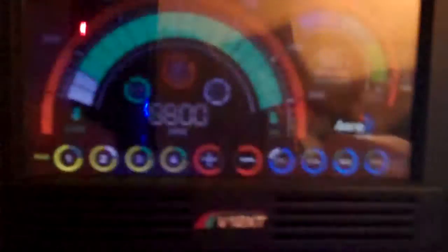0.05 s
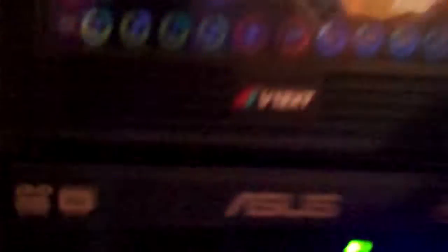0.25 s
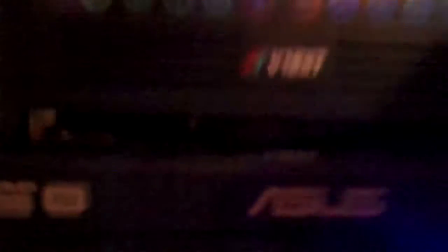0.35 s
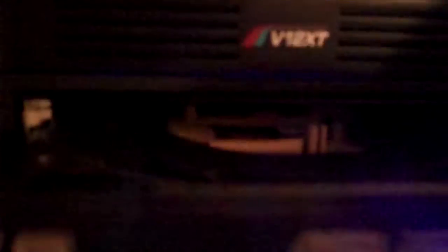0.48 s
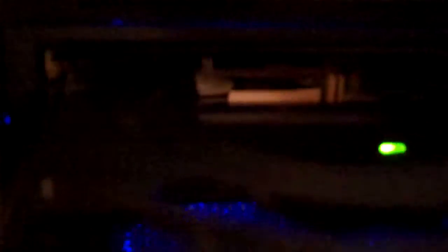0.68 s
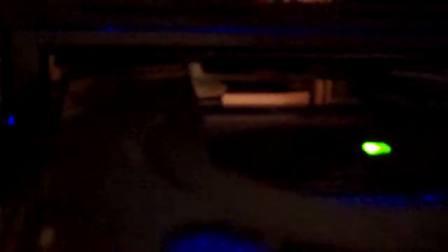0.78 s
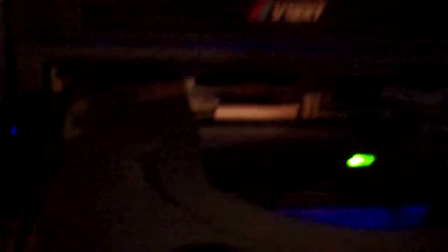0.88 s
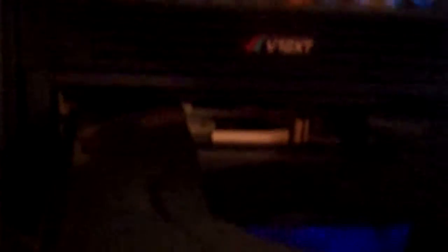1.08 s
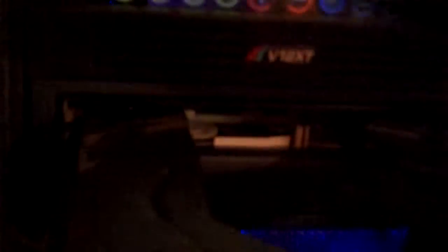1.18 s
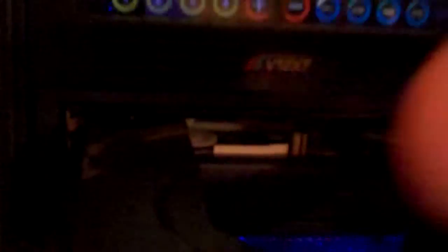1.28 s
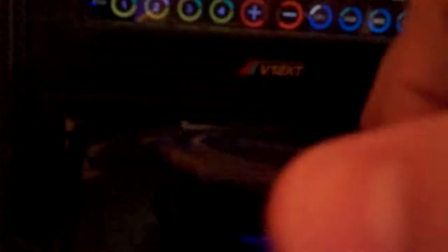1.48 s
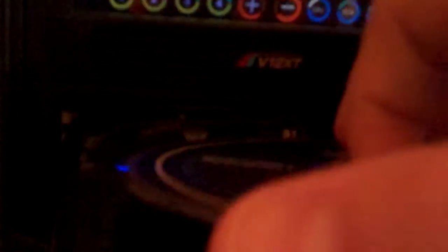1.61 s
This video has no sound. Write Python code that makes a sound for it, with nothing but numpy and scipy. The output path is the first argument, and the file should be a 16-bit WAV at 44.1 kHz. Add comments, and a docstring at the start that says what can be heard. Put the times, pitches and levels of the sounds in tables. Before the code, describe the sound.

A compact disc is placed on an open plastic computer drive tray, heard close in a small room. At 0.15-0.35 s it bumps, scrapes and chatters brightly, loudest near 0.29. A faint gritty slide with tiny squeaks follows until a crisp paired click at 0.86 and brief rattle. Near 1.44 s comes a light double tap, then faint rustle. A quiet fan whirs throughout.

```python
"""A compact disc is laid on the open plastic tray of a computer drive, close by in a small room.
It bumps the tray, scrapes, chatters and clicks over the rim, slides on with brief squeaks and seats in
its recess with a close pair of clicks and a grainy rattle; later the tray gets a light double tap and
a faint rustle. The computer's fan runs throughout. Impacts excite decaying modes and noise bursts;
friction is filtered random slips; squeaks and rattle are unsteady tones; the fan is noise and tones."""
import sys
import numpy as np
from scipy import signal
from scipy.fft import rfft, irfft
from scipy.io import wavfile
from scipy.ndimage import uniform_filter1d

SR = 44100
rng = np.random.default_rng(int(sys.argv[2]) if len(sys.argv) > 2 else 0)


def generate_wav(signal):
    """Clip the signal to [-1, 1] and save it as 16-bit WAV at the path in sys.argv[1]."""
    frames = np.transpose(np.atleast_2d(signal))
    scaled = np.clip(frames, -1, 1) * 32767
    pcm = np.round(scaled).astype(np.int16)
    wavfile.write(sys.argv[1], SR, pcm)


N = 72765
T = np.arange(N) / SR  # time in seconds

# Soft bumps of the tray. Each row: start in seconds, level in dB.
BUMPS = [(0.1956, -34.5), (0.2, -37.5), (0.217, -40), (0.2318, -32.5), (0.279, -40.5), (0.31, -40.5),
         (1.452, -51), (1.484, -56)]
# Hollow ring of the tray. Each row: frequency in Hz, relative level in dB.
TRAY_MODES = [(170, -9.5), (328, 4.5), (378, 7), (425, 4), (612, -1), (750, 1.5)]
# Colour of a bump. Each row: frequency in Hz, relative level in dB per Hz.
THUD_COLOUR = [(200, -18.5), (370, 2), (800, -6.5), (3000, -39.5)]
# The disc's edge knocking on the tray. Each row: start in seconds, level in dB.
CHATTER = [(0.1442, -52), (0.2013, -29.5), (0.2019, -33), (0.2104, -32.5), (0.2699, -32.5), (0.284, -22),
           (0.2873, -24.5), (0.2899, -17), (0.2922, -36), (0.3, -22), (0.308, -22.5), (0.3126, -23),
           (0.3217, -26), (0.3327, -29.5)]
# Ring of the disc. Each row: frequency in Hz, relative level in dB.
DISC_MODES = [(571, -8.5), (861, -9.5), (1180, 0.5), (1338, -8), (1495, -13), (2386, -2), (3000, 7),
              (3130, 7), (3244, 2), (3296, -9), (3504, 7.5), (3646, -8), (3852, 4), (4130, -21)]
# Colour of the edge, knocking or biting. Each row: frequency in Hz, relative level in dB per Hz.
EDGE_COLOUR = [(150, -47), (250, -19), (543, -18), (1010, -17), (1300, -11), (2270, -13), (3070, -1.5),
               (5180, -9.5), (7630, -13.5), (14000, -31)]
# Sharp clicks of the disc: one on the rim during the scrape, then a close pair as it seats.
# Each row: start in seconds, level in dB, treble tilt in dB per octave.
CLICKS = [(0.2436, -28.5, 4.5), (0.8557, -29.5, 3), (0.857, -33, -2.5)]
# Short ring of the clicks. Each row: frequency in Hz, relative level in dB.
CLICK_MODES = [(520, -3), (690, -4), (1285, 6), (3050, 0), (3480, 1), (4050, -6), (5200, -5), (7450, -1)]
# Light taps on the tray. Each row: start in seconds, level in dB, treble tilt in dB per octave.
TAPS = [(1.4363, -39, -2), (1.4455, -37, -1.5), (1.4472, -35, 1), (1.459, -46.5, -4.5)]
# Ring of the tapped rim. Each row: frequency in Hz, relative level in dB.
TAP_MODES = [(560, -10), (850, -6), (1450, 0.5), (2300, -5), (3000, 0.5), (3880, 7), (5050, -9),
             (6520, 8.5)]
# Contact noise of clicks and taps. Each row: frequency in Hz, relative level in dB per Hz.
SNAP_COLOUR = [(180, -20.5), (500, -3), (1900, -2), (3900, -2.5), (7500, -7), (11500, -15.5), (14000, -25)]
# Strength of the scrape over the rim. Each row: time in seconds, level in dB.
SCRAPE_FORCE = [(0.193, -41.5), (0.2, -41), (0.217, -34.5), (0.227, -45.5), (0.24, -46.5), (0.256, -34),
                (0.275, -32.5), (0.29, -29.5), (0.312, -30), (0.325, -44), (0.365, -44), (0.44, -61)]
# Colour of the scrape. Each row: frequency in Hz, relative level in dB per Hz.
SCRAPE_COLOUR = [(100, -47), (200, -13.5), (945, -2.5), (1190, -0.5), (1910, 0.5), (2950, -4.5),
                 (4160, -15.5), (11800, -28), (14000, -39)]
# Strength of the slide. Each row: time in seconds, level in dB.
SLIDE_FORCE = [(0.145, -55), (0.19, -51.5), (0.33, -46.5), (0.41, -47.5), (0.49, -49), (0.58, -46),
               (0.69, -50), (0.79, -44.5), (0.82, -49.5), (0.875, -46.5), (0.91, -49), (0.96, -74)]
# Colour of the slide. Each row: frequency in Hz, relative level in dB per Hz.
SLIDE_COLOUR = [(100, -42), (310, -5), (600, 1), (980, -6), (1300, 1), (3300, 0.5), (4050, -8), (4600, -7),
                (14000, -26.5)]
# Resonances of the sliding disc. Each row: frequency in Hz, width in Hz, relative level in dB.
SLIDE_PEAKS = [(816, 45, 2), (1285, 51, 1.5), (1880, 99, -0.5), (2940, 180, 0.5), (3150, 180, 1.5),
               (3430, 180, 1), (4300, 280, -5.5), (6050, 320, -8.5)]
# Squeaks of the sliding disc; the last row is a brief grainy rattle just after it seats.
# Each row: start in seconds, length in seconds, frequency in Hz, level in dB.
SQUEAKS_AND_RATTLE = [(0.24, 0.014, 7270, -38.5), (0.371, 0.039, 4520, -51), (0.739, 0.0063, 3490, -39.5),
                      (0.769, 0.0081, 3600, -40.5), (0.829, 0.015, 3190, -45), (0.864, 0.015, 3980, -46)]
# Strength of the faint rustle of handling. Each row: time in seconds, level in dB.
RUSTLE_FORCE = [(1.46, -67), (1.515, -66.5), (1.57, -60.5), (1.585, -85)]
# Colour of the rustle. Each row: frequency in Hz, relative level in dB per Hz.
RUSTLE_COLOUR = [(250, -24), (350, 2), (600, 9), (4500, 2.5), (8500, -0.5), (10000, -9)]
# Colour of the fan's rushing air. Each row: frequency in Hz, relative level in dB per Hz.
FAN_COLOUR = [(30, 1), (127, -13.5), (264, -6), (401, -4), (476, -6.5), (899, -2.5), (1150, -3),
              (3100, -13), (14000, -33.5)]
# Blade tones of the fan. Each row: frequency in Hz, level in dB.
FAN_LINES = [(268.5, -78.5), (860, -70.5), (931.3, -72.5), (1065, -68.5), (1199, -74)]

# ring times are t60 at 1 kHz, higher modes die sooner; the finger damps the tapped rim
TRAY_RING_S, DISC_RING_S, CLICK_RING_S, TAP_RING_S = 0.061, 0.15, 0.057, 0.036
BUMP_T60_S, EDGE_T60_S, CLICK_T60_S = 0.035, 0.034, 0.024  # contact noise
DISC_RING_DB, CLICK_RING_DB, SLIDE_RING_DB = -9.5, -3.5, -0.5
THUD_DB, SNAP_DB = 1, -1  # contact noise against the ring
GRAINS_PER_S, SCRAPE_SCATTER_DB, SLIDE_SCATTER_DB = 6000, -3, 1.5
BITE_DB = 31.5  # hard pressure makes the edge bite: a bright layer that grows with the force squared
FLUTTER_DB = 2.5  # uneven grip of the slide
FAN_DB = -59  # rushing air
ROOM_T60_S, ROOM_DB, ROOM_DAMP_HZ = 0.26, -10, 4570
LOW_CUT_HZ, TOP_HZ = 190, 14100


def impacts():
    """Impulsive excitation: each blow sets a body ringing and adds a burst of contact noise."""
    out = ring(TRAY_MODES, TRAY_RING_S, BUMPS)
    out += undb(DISC_RING_DB) * ring(DISC_MODES, DISC_RING_S, CHATTER)
    out += clicks(CLICKS, CLICK_MODES, CLICK_RING_S)
    out += clicks(TAPS, TAP_MODES, TAP_RING_S)
    for start, db in BUMPS:
        add(out, start, undb(db + THUD_DB) * crack(THUD_COLOUR, BUMP_T60_S))
    for start, db in CHATTER:
        add(out, start, undb(db) * crack(EDGE_COLOUR, EDGE_T60_S))
    return out


def clicks(rows, modes, t60):
    """Contact stiffness: a snap of noise and a short ring; harder contact favours the high modes."""
    out = np.zeros(N)
    for start, db, tilt in rows:
        tilted = [(hz, level + tilt * np.log2(hz)) for hz, level in modes]
        out += undb(CLICK_RING_DB) * ring(tilted, t60, [(start, db)])
        add(out, start, undb(db + SNAP_DB) * crack(SNAP_COLOUR, CLICK_T60_S, tilt))
    return out


def ring(modes, t60, blows, detune_hz=7):
    """Modal decay: each mode stores the energy of the blows and leaks it away, its pitch unsteady."""
    energy = np.zeros(N)
    for start, db, *_ in blows:
        energy[int(start * SR)] += undb(db) ** 2
    contact = SR // 1000  # each blow lasts about 1 ms
    energy = np.convolve(energy, np.ones(contact) / contact)[:N]
    out = 0
    for hz, db in modes:
        mode_t60 = t60 * np.sqrt(1000 / hz)
        kept = np.exp(-2 * np.log(1000) / (SR * mode_t60))  # share of energy kept per sample
        amplitude = np.sqrt(signal.lfilter([1], [1, -kept], energy))
        pitch = hz + detune_hz * waver(0.012)
        phase = 2 * np.pi * (rng.random() + np.cumsum(pitch) / SR)
        out = out + undb(db) * amplitude * np.sin(phase)
    return out / np.sqrt(sum(undb(db) ** 2 / 2 for _, db in modes))


def crack(points, t60, tilt_db=0):
    """High modal density: crowded, short-lived modes merge into a coloured burst that starts at rms 1."""
    shape = fade(t60)
    burst = colour(rng.standard_normal(N) * shape, points, tilt_db)
    return burst * np.sqrt(np.sum(shape ** 2) / np.sum(burst ** 2))


def rubbing():
    """Dry friction: a rough scrape, brighter as it presses, and a finer slide with fluttering resonances."""
    press = force(SCRAPE_FORCE)
    scrape = unit(colour(grains(SCRAPE_SCATTER_DB), SCRAPE_COLOUR))
    bite = undb(BITE_DB) * press * unit(colour(grains(SCRAPE_SCATTER_DB), EDGE_COLOUR))
    slips = grains(SLIDE_SCATTER_DB)
    sing = np.zeros(N)
    for hz, width, db in SLIDE_PEAKS:
        resonance = signal.lfilter(*signal.iirpeak(hz, hz / width, fs=SR), slips)
        sing += undb(db + FLUTTER_DB * waver(0.016)) * resonance
    hiss = unit(colour(grains(SLIDE_SCATTER_DB), SLIDE_COLOUR))
    slide = unit(hiss + undb(SLIDE_RING_DB) * unit(sing))
    return (scrape + bite) * press + slide * force(SLIDE_FORCE)


def squeaks_and_rattle(rough=0.033):
    """Random frequency modulation: short tones of unsteady pitch that rise quickly and die away."""
    out = np.zeros(N)
    for start, length, hz, db in SQUEAKS_AND_RATTLE:
        jitter = unit(uniform_filter1d(rng.standard_normal(N), size=40))
        pitch = hz * (1 + rough * jitter)
        shape = np.sin(np.pi * np.sqrt(np.clip(T / length, 0, 1)))
        tone = np.sqrt(2) * np.sin(2 * np.pi * np.cumsum(pitch) / SR)
        add(out, start, undb(db) * shape * tone)
    return out


def rustle():
    """Light friction: dense slips, coloured, brush faintly after the last tap."""
    return unit(colour(grains(SLIDE_SCATTER_DB), RUSTLE_COLOUR)) * force(RUSTLE_FORCE)


def grains(scatter_db):
    """Friction as a random pulse train: dense tiny slips of either sign and uneven size."""
    hit = rng.random(N) < GRAINS_PER_S / SR
    sign = rng.choice([-1, 1], N)
    size = undb(scatter_db * np.minimum(rng.exponential(size=N), 4))
    return hit * sign * size


def force(curve):
    """Friction noise follows contact force: gain along (s, dB) points, silent outside them."""
    return undb(np.interp(T, *np.array(curve).T, left=-200, right=-200))


def room(x):
    """Reverberation: a short, dull, exponentially decaying tail from desk and walls."""
    tail = rng.standard_normal(N) * fade(ROOM_T60_S)
    tail *= 1 - np.exp(-T / 0.00096)  # gradual onset
    tail /= np.linalg.norm(tail)
    damping = signal.butter(1, ROOM_DAMP_HZ, fs=SR, output="sos")
    tail = signal.sosfilt(damping, tail)
    return x + undb(ROOM_DB) * signal.fftconvolve(x, tail)[:N]


def fan(wander_hz=4, flicker_db=3.5, waver_s=0.0517):
    """Flow noise and blade tones: rushing air with lines that waver in pitch and level."""
    out = undb(FAN_DB) * unit(colour(rng.standard_normal(N), FAN_COLOUR))
    for hz, db in FAN_LINES:
        phase = 2 * np.pi * np.cumsum(hz + wander_hz * waver(waver_s)) / SR
        out += undb(db + flicker_db * waver(waver_s)) * np.sin(phase)
    return out


def colour(x, points, tilt_db=0):
    """Minimum-phase filtering: a causal response through (Hz, dB) points, tilted about 3 kHz."""
    size = 2048
    hz, db = np.array(points).T
    octave = np.log2(np.maximum(np.arange(size // 2 + 1), .5) * SR / size)
    tilt = tilt_db * np.clip(octave - np.log2(3000), -3, 3)
    gain_db = np.interp(octave, np.log2(hz), db) + tilt
    # folding the cepstrum onto positive time makes the filter causal
    cepstrum = irfft(np.log(undb(gain_db)))
    cepstrum[1:size // 2] *= 2
    cepstrum[size // 2 + 1:] = 0
    return signal.fftconvolve(x, irfft(np.exp(rfft(cepstrum))))[:N]


def waver(seconds):
    """Low-pass randomness: smooth chance of rms 1 that changes over the given time."""
    size = int(np.clip(seconds * SR, 2, N // 4))
    smooth = uniform_filter1d(rng.standard_normal(N), size)
    return unit(uniform_filter1d(smooth, size))


def fade(t60):
    """Exponential decay: amplitude falls by 60 dB in t60 seconds."""
    return np.exp(-np.log(1000) * T / max(t60, 1e-3))


def undb(db):
    """Logarithmic level: decibels to amplitude gain."""
    return 10 ** (np.asarray(db) / 20)


def unit(x):
    """Effective value: scale to rms 1."""
    return x / np.sqrt(np.mean(x ** 2))


def add(out, start, x):
    """Superposition: mix x in from a start time in seconds."""
    i = int(start * SR)
    out[i:] += x[:N - i]


def scene():
    """Superposition: disc and tray, thin in the bass, in the room over the fan."""
    handling = room(impacts() + rubbing() + squeaks_and_rattle() + rustle())
    low_cut = signal.butter(2, LOW_CUT_HZ, "highpass", fs=SR, output="sos")
    return (signal.sosfilt(low_cut, handling) + fan())[None]


def record(dry):
    """Band limiting: the recorder cuts the top with a steep low-pass."""
    top_cut = signal.ellip(12, .2, 85, TOP_HZ, fs=SR, output="sos")
    return signal.sosfilt(top_cut, dry)


dry = scene()
out = record(dry)
generate_wav(out)
```